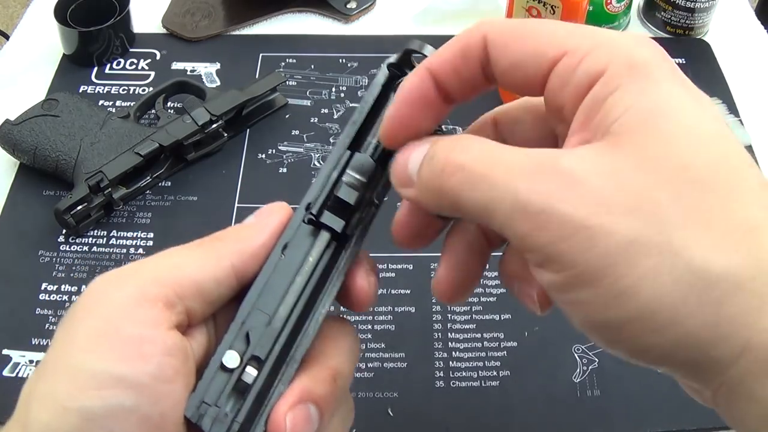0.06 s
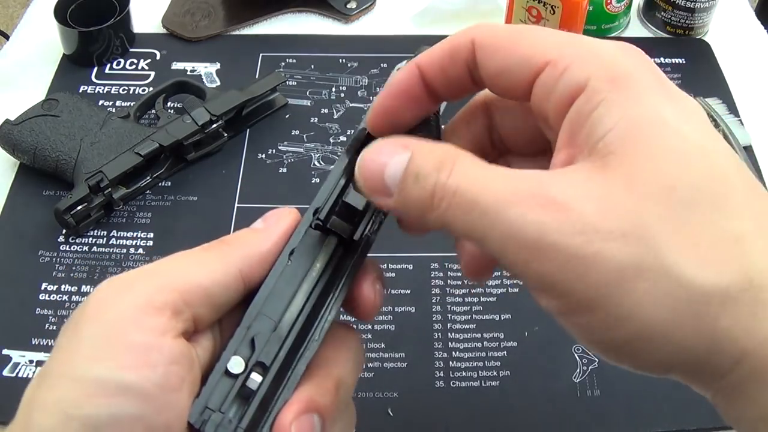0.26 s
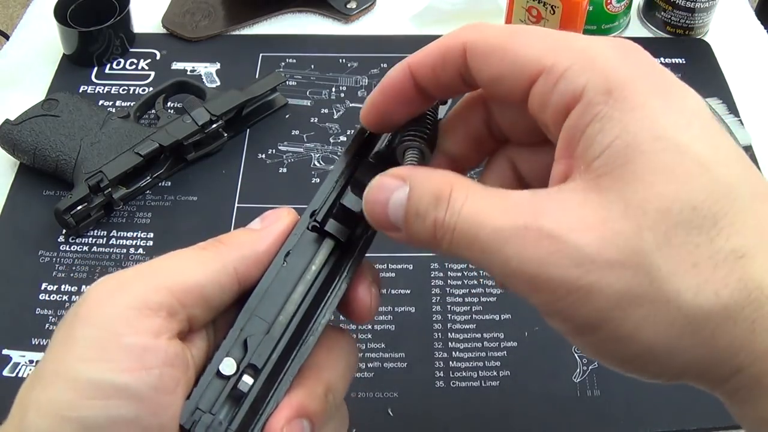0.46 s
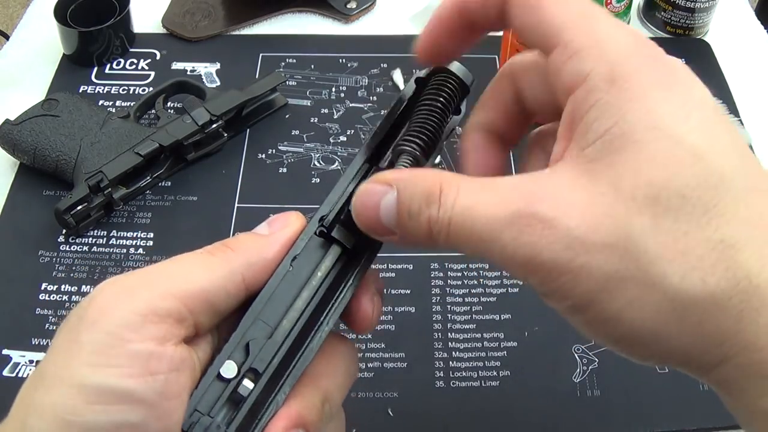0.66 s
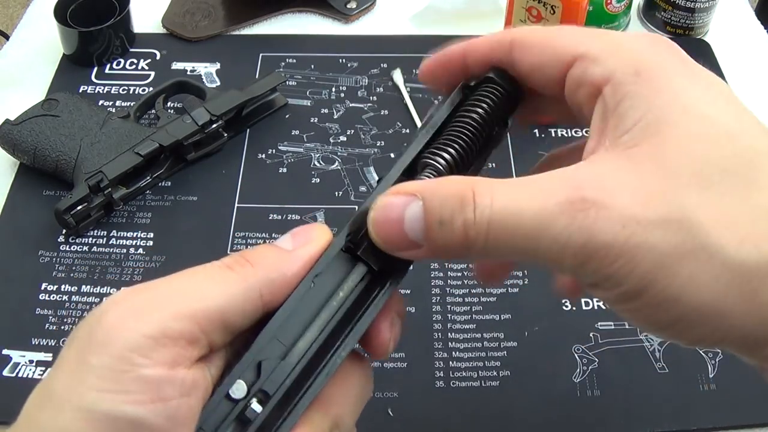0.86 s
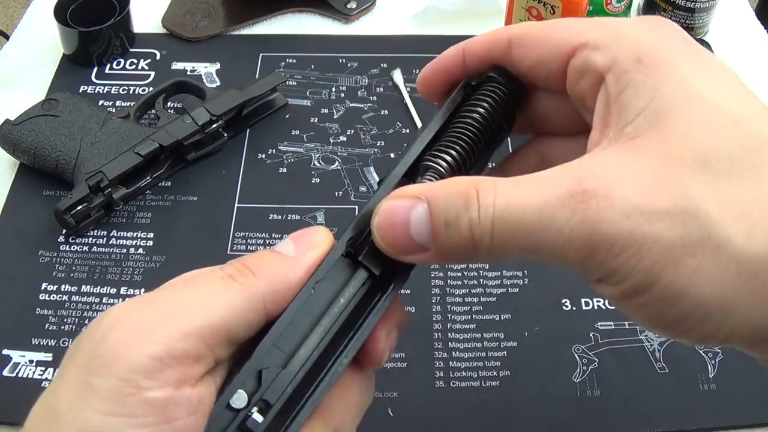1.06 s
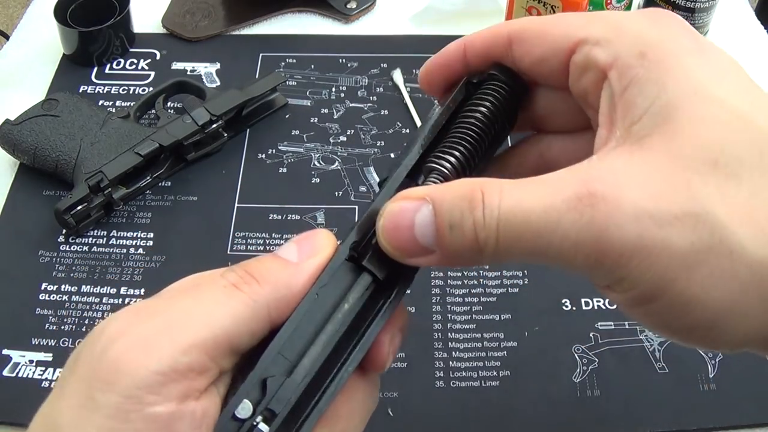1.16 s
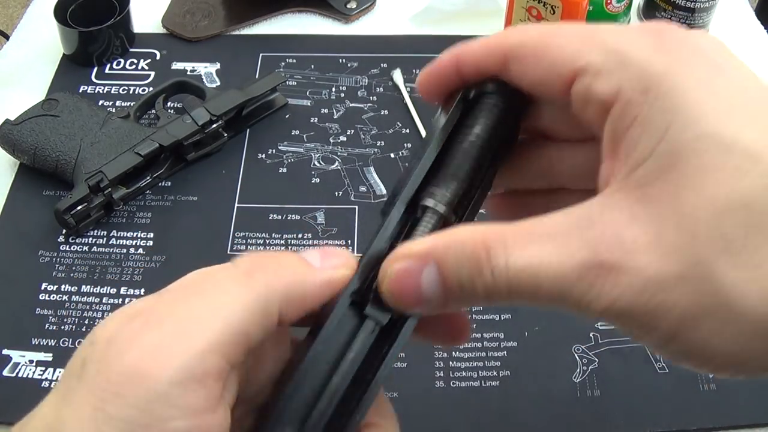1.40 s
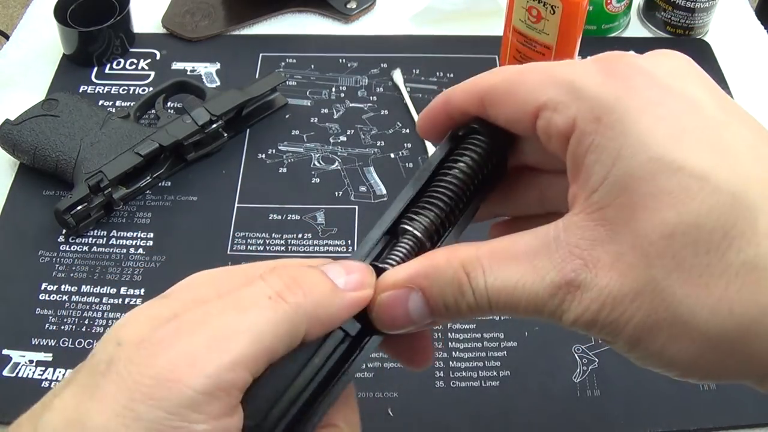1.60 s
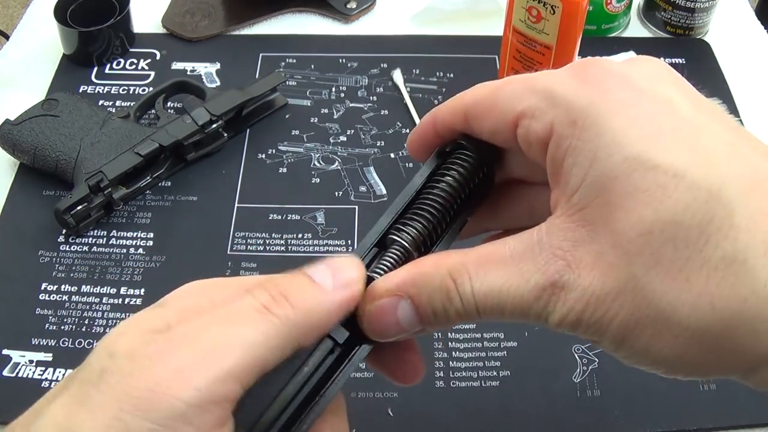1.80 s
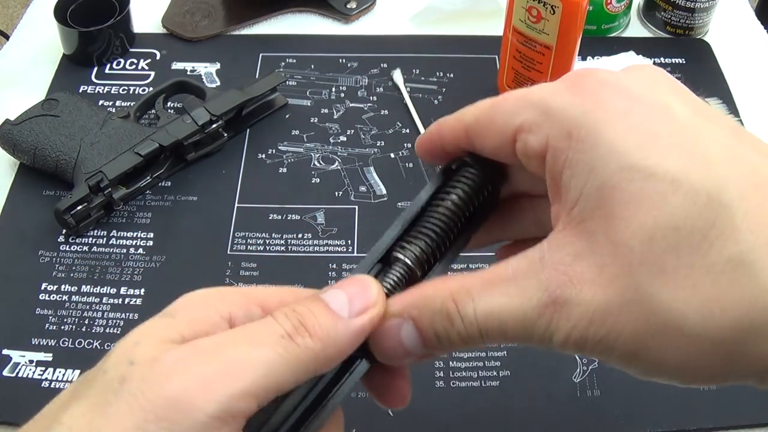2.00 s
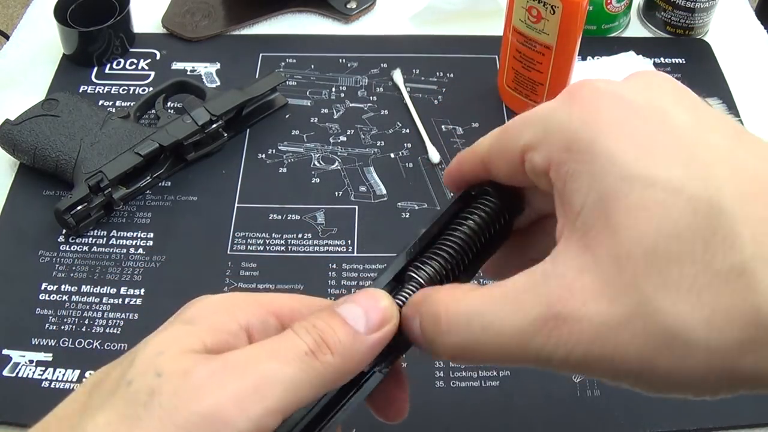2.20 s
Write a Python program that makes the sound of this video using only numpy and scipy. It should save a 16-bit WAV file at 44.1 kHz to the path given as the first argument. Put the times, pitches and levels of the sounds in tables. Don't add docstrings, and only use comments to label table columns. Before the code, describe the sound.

Small steel handgun parts rattle and scrape in two quick bursts, then a spring rod snaps and clicks sparsely into its seat, one click sharp and loud; close stereo camera microphone, quiet room, faint hiss.

```python
import sys
import numpy as np
from scipy import signal
from scipy.fft import rfft, irfft, next_fast_len
from scipy.io import wavfile
from scipy.ndimage import map_coordinates

SR = 44100
rng = np.random.default_rng(int(sys.argv[2]) if len(sys.argv) > 2 else 0)


def transcribe(signal):
    frames = np.atleast_2d(signal).T
    limited = np.clip(frames, -1, 1)
    pcm = np.round(limited * 32767).astype(np.int16)
    wavfile.write(sys.argv[1], SR, pcm)


def decibels_to_gain(level_db):
    exponent = np.asarray(level_db, float) / 20
    return 10 ** exponent


N = 99225
TOP_HZ = 15850
RING_DB = 3.5
HIGH_DB = 5

# f/Hz, level/dB, time to fall 60 dB/s
BARREL_LOW = [(2397, -3.5, 0.017), (2520, -14.5, 0.037), (3440, -2, 0.018), (4180, -8.5, 0.01),
              (2370, -27, 0.17), (3464, -28, 0.19), (2590, -29, 0.16)]
BARREL_HIGH = [(8360, -13, 0.013), (9460, -2, 0.021), (10620, -9, 0.018), (10820, -4.5, .008),
               (11500, 0, 0.017), (12070, 0, 0.014), (14100, -23, .006)]
SPRING_LOW = [(1280, -1, 0.011), (2230, -8.5, 0.017), (2375, -6, 0.025), (3060, -8, 0.023),
              (3330, -2.5, 0.011), (3850, -3, 0.015), (4010, 1, 0.012), (4600, 0, 0.0078)]
SPRING_HIGH = [(7350, -10, 0.005), (8500, -16, 0.015), (9530, -2, 0.0093), (10400, -5, 0.022),
               (11130, -1.5, 0.01), (12900, -18, 0.026)]
# f/Hz, level/dB, time to fall 60 dB/s
SEATED_RING = [(5250, -1, 0.078)]
# f/Hz, level/dB
RASP = [(700, -46), (1800, -35), (2600, -8), (4500, -6), (7000, -4), (11000, -32), (15500, -14)]


def unit(x):
    return x / np.sqrt(np.mean(x ** 2) + 1e-30)


def along(points, hz):
    f, value = np.transpose(points)
    return np.interp(np.log(hz + 1), np.log(f + 1), value)


def filtered(x, response):
    size = next_fast_len(x.shape[-1] + 8192)
    spectrum = rfft(x, size) * response(np.fft.rfftfreq(size, 1 / SR))
    return irfft(spectrum, size)[..., :x.shape[-1]]


def placed(s, sound):
    lead_s = 0.001204
    at = round((s + lead_s) * SR)
    return np.pad(sound, (at, N - at))[:N]


def ring(modes, damping=1, scatter_db=0):
    attack_s = 0.00021
    t = np.arange(SR // 3) / SR
    hz, db, t60 = np.transpose(modes)[..., None]
    db = db + scatter_db * rng.standard_normal(db.shape)
    decay = decibels_to_gain(db - 60 * damping * t / t60)
    return np.sum(decay * np.sin(2 * np.pi * hz * t), axis=0) * (1 - np.exp(-t / attack_s))


def contact(s, crack_db, parts):
    # f/Hz, level/dB, time to fall 60 dB/s
    crack = [(2450, -27, 0.0071), (3740, -15.5, 0.005), (6020, -10.5, 0.0039), (8500, -17.5, 0.0041),
             (11000, 4, 0.0027), (12400, 0.5, 0.0026), (14600, -15, 0.0043)]
    dust_db, dust_t60 = -18, 0.038
    t = np.arange(SR // 3) / SR
    dust = filtered(rng.standard_normal(len(t)), lambda hz: decibels_to_gain(along(RASP, hz)))
    sound = dust * decibels_to_gain(crack_db + dust_db - 60 * t / dust_t60)
    for db, modes in [(crack_db, crack), *parts]:
        sound = sound + decibels_to_gain(db) * ring(modes, scatter_db=1)
    return placed(s, sound)


def gripped(s, db, modes):
    grip_s, fade_s, grip_db = 0.019, 0.0076, -9
    sound = ring(modes)
    grip = 1 / (1 + np.exp((grip_s - np.arange(len(sound)) / SR) / fade_s))
    return placed(s, decibels_to_gain(db + RING_DB + grip_db * grip) * sound)


def barrel_taps():
    # t/s, crack level/dB, low modes level/dB, slide ring level/dB, high modes level/dB
    taps = [(.209, -8.5, -34.5, -34.5, -40), (0.252, -25, -49, -44.5, -30.5), (0.2533, -42, -64, -56, -37),
            (.282, -40, -50, -61, -60), (0.2855, -32, -34.5, -45, -48), (0.3079, -55, -48, -74, -56),
            (0.3212, -50, -52, -64, -51), (0.3341, -52, -52.5, -67, -62), (0.3532, -48, -57.5, -69, -66),
            (0.512, -45, -64, -76, -47.5), (0.526, -55, -61, -80, -49), (.5332, -50, -54, -78, -51),
            (0.5435, -41, -43.5, -75, -42), (0.5494, -36, -50, -65, -44),
            (.5504, -21.5, -45.5, -47.5, -30.5), (0.5993, -60, -73, -80, -56)]
    # f/Hz, level/dB, time to fall 60 dB/s
    slide_ring = [(5190, -1.5, 0.07)]
    crack_extra_db, low_extra_db = 1.5, 8
    out = np.zeros(N)
    for s, crack_db, low_db, ring_db, high_db in taps:
        parts = [(low_db + low_extra_db, BARREL_LOW), (high_db + HIGH_DB, BARREL_HIGH)]
        out += contact(s, crack_db + crack_extra_db, parts)
        out += gripped(s, ring_db, slide_ring)
    return out


def friction(rows, low, high, damping, rasp_db):
    peaky, judder_db, judder_per_s = 1.11, 2.5, 74
    slips_per_s, spread_db = 6000, 0.8
    t, out = np.arange(N) / SR, np.zeros(N)
    for column, modes in ((2, low), (3, high)):
        stroke = np.zeros(N)
        for row in rows:
            progress = np.clip((t - row[0]) / row[1], 0, 1)
            stroke += decibels_to_gain(row[column]) * np.sin(np.pi * progress) ** peaky
        judder = map_coordinates(rng.standard_normal(N // 100), [t * judder_per_s])
        stroke = stroke * decibels_to_gain(judder_db * judder)
        slips = (rng.random(N) < slips_per_s / SR) * rng.standard_normal(N)
        slips = slips * decibels_to_gain(spread_db * rng.exponential(size=N))
        excite = unit(slips) * stroke
        body = ring(modes, damping=damping)
        out += signal.fftconvolve(excite, body / np.linalg.norm(body))[:N]
    return out + decibels_to_gain(rasp_db) * filtered(excite, lambda hz: decibels_to_gain(along(RASP, hz)) * (hz < TOP_HZ))


def barrel_scrapes():
    # start t/s, length/s, low modes level/dB, high modes level/dB
    scrapes = [
        (0, 0.042, -69, -62.5),
        (.21, 0.049, -53, -50),
        (.258, 0.045, -86, -56.5),
        (.295, 0.03, -50, -55.5),
        (.33, 0.1, -66.5, -71),
        (.445, 0.04, -61, -64),
        (.5, 0.038, -58.5, -61),
        (.525, 0.036, -50.5, -49.5),
        (.555, 0.068, -67, -67),
        (.75, 0.045, -64.5, -54.5),
    ]
    return friction(scrapes, BARREL_LOW, BARREL_HIGH, damping=4, rasp_db=1)


def spring_taps():
    # t/s, low modes level/dB, best struck f/Hz, slide ring level/dB, high modes level/dB
    taps = [(0.6603, -42, 4000, -80, -56), (0.7883, -42, 3800, -78, -52), (.8, -41.5, 2500, -80, -54),
            (.81, -50, 4500, -74, -55), (0.915, -56, 2320, -72, -56.5), (0.924, -57, 3140, -79, -63),
            (0.9482, -51, 3990, -77, -62), (1.5559, -40.5, 3990, -78, -62), (1.674, -44, 1480, -72, -69),
            (1.8171, -48, 4030, -67, -57), (1.8536, -50.5, 4020, -82, -62)]
    # f/Hz, level/dB, time to fall 60 dB/s
    snap = [(2370, -14.5, 0.029), (3060, -22, 0.02), (3650, -33, 0.007), (3950, -6, 0.011),
            (4080, -5.5, 0.014), (4290, -1.5, 0.0086), (4570, -3.5, 0.0086), (4900, -9, 0.01),
            (5180, -15.5, 0.018), (7800, -14, 0.011), (10600, -18, 0.008), (10920, 1, 0.014),
            (12300, -22, .007)]
    snap_s, snap_db = 0.6618, -17.5
    low_extra_db, crack_extra_db, focus_db_per_octave = -5, 8, 6.5
    out = contact(snap_s, snap_db - 35, [(snap_db, snap)])
    for s, low_db, focus_hz, ring_db, high_db in taps:
        low = [(hz, db - focus_db_per_octave * abs(np.log2(hz / focus_hz)), t60)
               for hz, db, t60 in SPRING_LOW]
        parts = [(low_db + low_extra_db, low), (ring_db + RING_DB, SEATED_RING),
                 (high_db + HIGH_DB, SPRING_HIGH)]
        out = out + contact(s, high_db + crack_extra_db, parts)
    return out


def rod_ticks():
    # (f/Hz, width/Hz, level/dB)
    ticks = [
        (1.1045, -33.5, -72, [(1340, 520, -12.5), (2270, 210, -4.5), (3300, 600, -14), (4100, 500, 1.5), (4900, 950, -11), (6350, 440, -16), (8500, 370, -10.5), (10300, 530, -4.5), (11400, 680, -7)]),
        (1.2324, -41, -80, [(1690, 450, -4), (2370, 250, 1.5), (3780, 440, -8), (4430, 400, -2), (7050, 500, -5), (9600, 1000, -6), (11600, 900, -8)]),
        (1.54, -21, -35.5, [(1560, 310, -23.5), (2160, 190, -21.5), (3030, 330, -16.5), (4270, 660, -12), (4530, 610, -24), (8550, 170, -18), (9450, 260, -13), (10300, 210, -14), (11300, 330, -19)]),
        (1.924, -42, -77, [(1390, 330, -5.5), (2300, 260, 0), (2980, 190, -2), (4290, 290, -4)]),
        (1.936, -48.5, -80, [(2300, 290, 0), (3000, 310, 0.5), (4380, 330, -2), (5200, 210, -7)]),
        (1.9835, -42.5, -68, [(2430, 220, -1.5), (3850, 540, 4), (4600, 470, -13), (11000, 900, -18)]),
        (2.0233, -36, -42, [(2170, 270, -3.5), (3300, 270, 1), (4200, 440, -0.5), (10400, 700, -10.5)]),
        (2.1423, -46.5, -85, [(3830, 520, 1)]),
        (2.212, -48, -85, [(3500, 670, 0.5), (12560, 1700, -3)]),
        (2.221, -47.5, -83, [(3800, 350, 2)]),
    ]
    # (f/Hz, level/dB, time to fall 60 dB/s)
    free_ring = (1.54, [(5230, -58, .45)])
    usual_width_hz, grit_db, grit_t60 = 268, -7.5, 0.017
    t = np.arange(SR // 3) / SR

    def resonances(f, peaks):
        return sum(decibels_to_gain(db) / (1 + ((f - hz) / (2 * width)) ** 2) for hz, width, db in peaks)

    out = placed(free_ring[0], ring(free_ring[1]))
    for s, tick_db, ring_db, peaks in ticks:
        modes = [(hz, db + 20 * np.log10(width / usual_width_hz), np.log(1000) / np.pi / width)
                 for hz, width, db in peaks]
        grit = unit(filtered(rng.standard_normal(len(t)), lambda f: resonances(f, peaks)))
        loudest_db = max(db for hz, width, db in peaks)
        grit = grit * decibels_to_gain(grit_db + loudest_db - 60 * t / grit_t60)
        out = out + placed(s, decibels_to_gain(tick_db) * (ring(modes) + grit)) + gripped(s, ring_db, SEATED_RING)
    return out


def spring_rubs():
    # start t/s, length/s, low modes level/dB, high modes level/dB
    rubs = [
        (.665, 0.025, -74, -83),
        (.68, 0.065, -62, -85),
        (.783, 0.034, -71, -58),
        (1.815, 0.021, -74, -61),
        (2.1, .065, -59, -70),
    ]
    return friction(rubs, SPRING_LOW, SPRING_HIGH, damping=2.2, rasp_db=7)


def thuds():
    # t/s, level/dB, f/Hz
    blows = [
        (.209, -43.5, 890),
        (.532, -45.5, 1200),
        (.55, -38.5, 1025),
        (.552, -56, 322),
        (.662, -50, 900),
        (1.104, -50, 1087),
    ]
    cycles = 14
    out = np.zeros(N)
    for s, db, hz in blows:
        t60 = cycles / hz
        out += placed(s, ring([(hz, db, t60), (1.27 * hz, db - 12, t60)]))
    return out


def finger():
    # start t/s, length/s, level/dB, centre f/Hz, width/Hz
    drags = [(0.97, .04, -66, 11000, 2000), (1.365, 0.024, -58, 10000, 1620),
             (1.36, .128, -57.5, 11000, 4000), (1.4, .045, -62, 10800, 500), (1.405, .035, -66, 12700, 400),
             (1.405, .07, -65, 4650, 350), (1.435, .055, -62, 3150, 450), (1.365, .125, -69, 340, 250),
             (1.365, .125, -61.5, 4500, 4000), (1.385, .09, -65, 14000, 2000),
             (0.68, 0.083, -64, 11000, 3000), (0.84, 0.012, -60, 9500, 400), (.76, .03, -62, 16000, 350),
             (0.666, 0.096, -64.5, 4700, 1500), (0.94, .028, -60, 12500, 2500),
             (2.095, 0.082, -62.5, 7500, 5300), (2.1, 0.033, -61, 3800, 700),
             (2.21, 0.024, -60.5, 3700, 500)]
    judder_db, judder_per_s = 1.5, 150
    t, out = np.arange(N) / SR, np.zeros(N)
    for s, length, db, hz, wide_hz in drags:
        catch = map_coordinates(rng.standard_normal(N // 100), [t * judder_per_s])
        swell = np.sin(np.pi * np.clip((t - s) / length, 0, 1))
        hiss = filtered(rng.standard_normal(N),
                        lambda f: np.exp(-((f - hz) / wide_hz) ** 2) * (f < TOP_HZ))
        out += decibels_to_gain(db + judder_db * catch) * swell * unit(hiss)
    return out


def room(x):
    # f/Hz, time to fall 60 dB/s
    echo_t60 = [(1000, 0.2), (4000, 0.12), (9000, 0.025)]
    hz, t, z = signal.stft(rng.standard_normal((2, SR // 3)), SR, nperseg=256)
    fade = decibels_to_gain(-60 * t / along(echo_t60, hz)[:, None])
    tail = signal.istft(z * fade, SR, nperseg=256)[1]
    delayed = np.pad(x, (150, 0))[None]
    return signal.fftconvolve(delayed, tail / np.linalg.norm(tail[0]), axes=1)[:, :N]


def background():
    # f/Hz, level/dB per Hz
    hiss = [(15, -29), (25, -9), (129, -7), (446, -7.5), (898, -10), (1240, -10), (2180, -12.5),
            (11300, -18.5), (15600, -20)]
    # f/Hz, likeness (1 = the same)
    alike = [(40, 1), (150, 0.9), (400, 0.47), (700, 0.033), (1500, 0.043), (3500, 0.52), (8000, 0.81),
             (13000, 0.96)]
    # f/Hz, rms level/dB
    tones = [(120, -79), (15734, -72)]
    hiss_db = -61.5

    def colour(hz):
        turn = np.arccos(np.clip(along(alike, hz), -1, 1)) / 2
        level = (hz < TOP_HZ) * decibels_to_gain(along(hiss, np.minimum(hz, 15500)))
        return level * [np.cos(turn), np.sin(turn)]

    mid, side = filtered(rng.standard_normal((2, N)), colour)
    out = decibels_to_gain(hiss_db) / np.std(mid) * np.array([mid + side, mid - side])
    t = np.arange(N) / SR
    for hz, db in tones:
        out = out + decibels_to_gain(db) * np.sqrt(2) * np.sin(2 * np.pi * hz * t)
    return out


def scene():
    small = signal.butter(3, 1020, "high", fs=SR, output="sos")
    barrel = signal.sosfilt(small, barrel_taps() + barrel_scrapes())
    spring = signal.sosfilt(small, spring_taps() + rod_ticks() + spring_rubs())
    metal = barrel * decibels_to_gain([[.2], [-.2]]) + spring * decibels_to_gain([[-.25], [.25]])
    echo = decibels_to_gain(-14.5) * room(barrel + spring)
    return metal + echo + thuds() + finger() + background()


def band_limit(x):
    return signal.sosfilt(signal.butter(12, 16860, fs=SR, output="sos"), x)


def record(dry):
    top_drop_db, end_hz = -10, 16860
    mix = filtered(dry, lambda hz: np.where(hz < TOP_HZ, 1, decibels_to_gain(top_drop_db)) * (hz < end_hz))
    return band_limit(mix)


dry = scene()
out = record(dry)
transcribe(out)
```